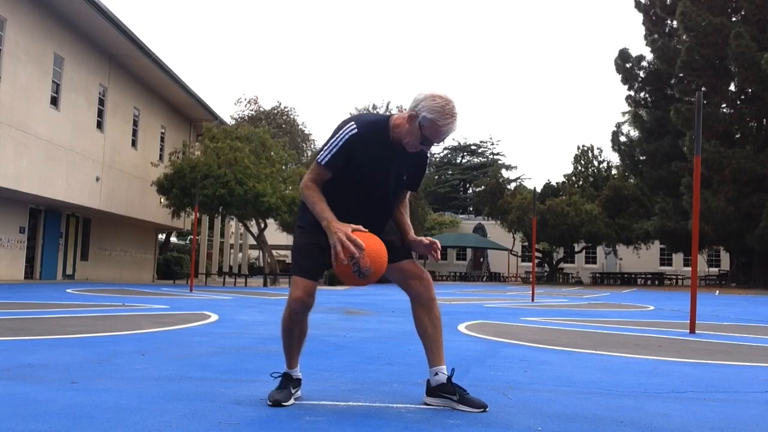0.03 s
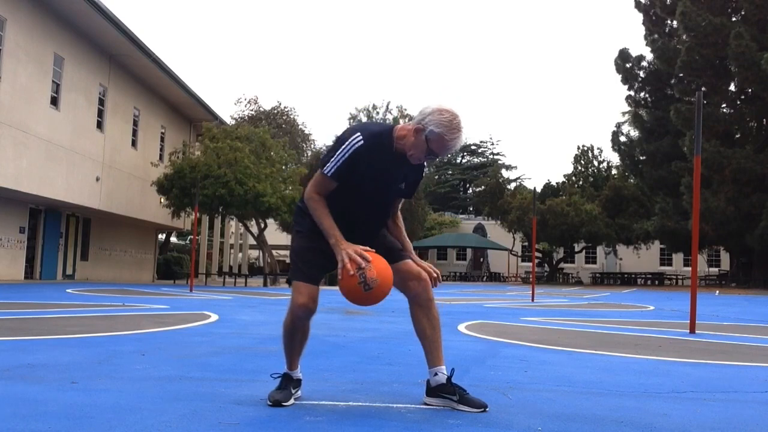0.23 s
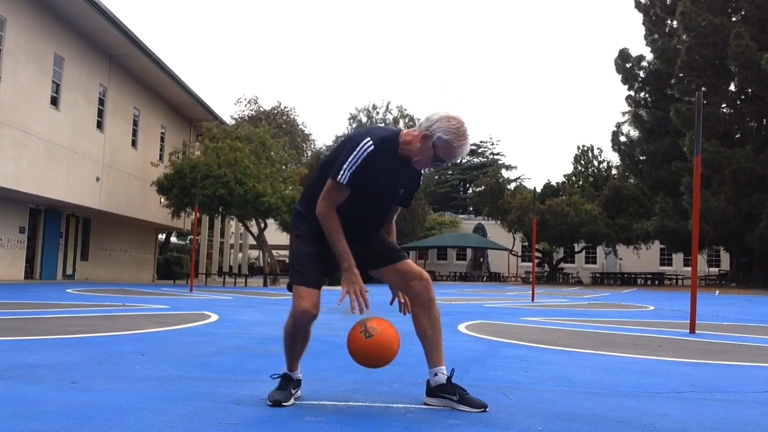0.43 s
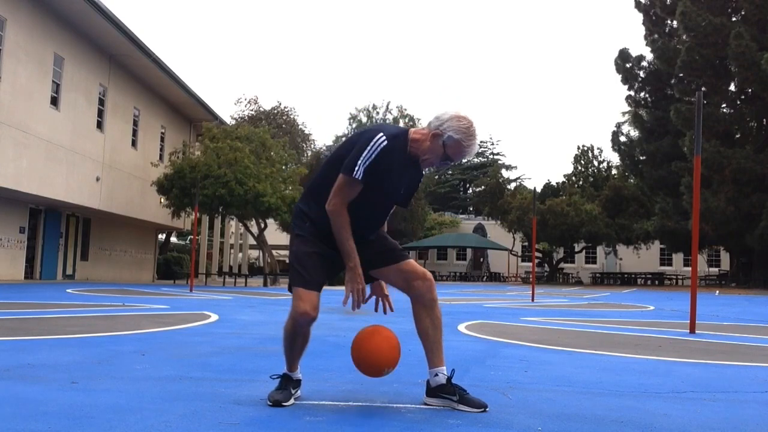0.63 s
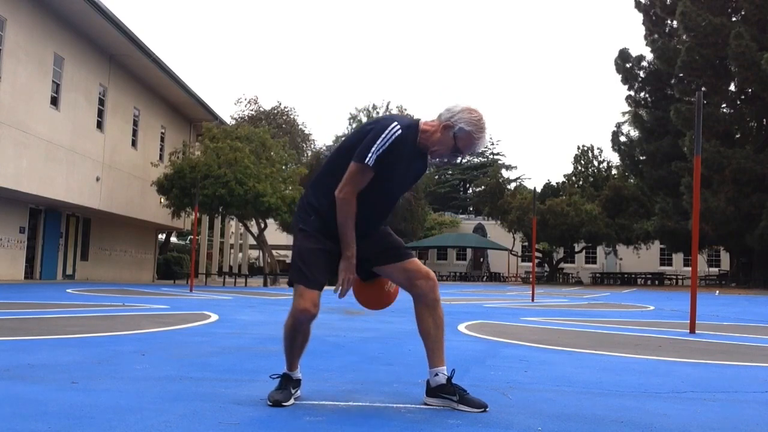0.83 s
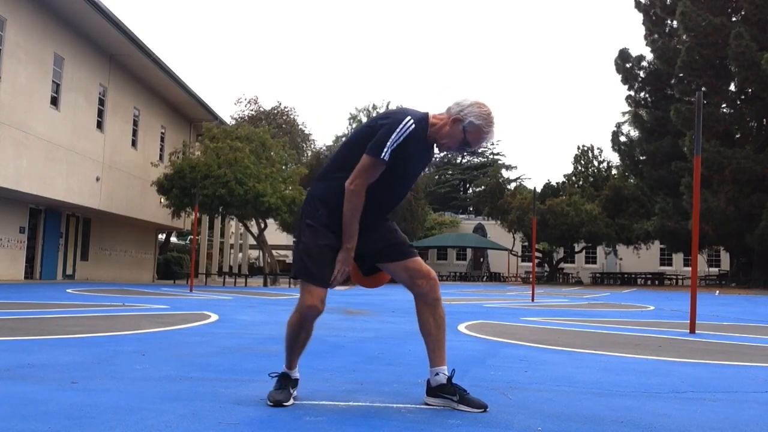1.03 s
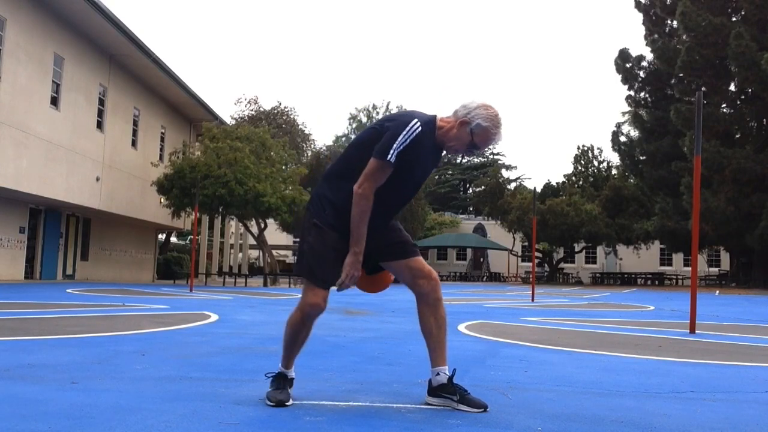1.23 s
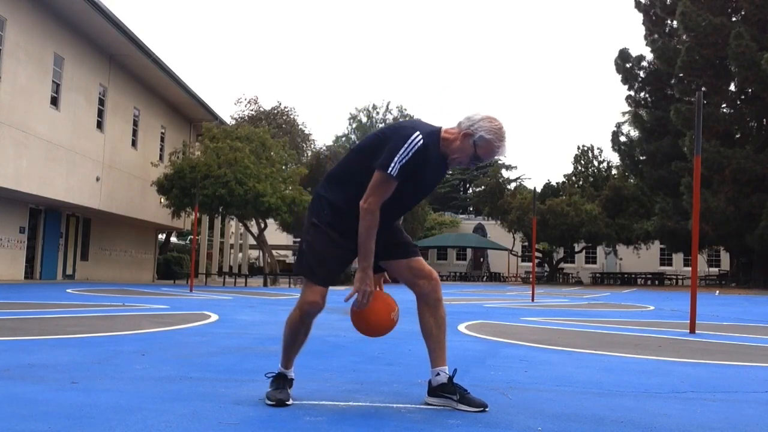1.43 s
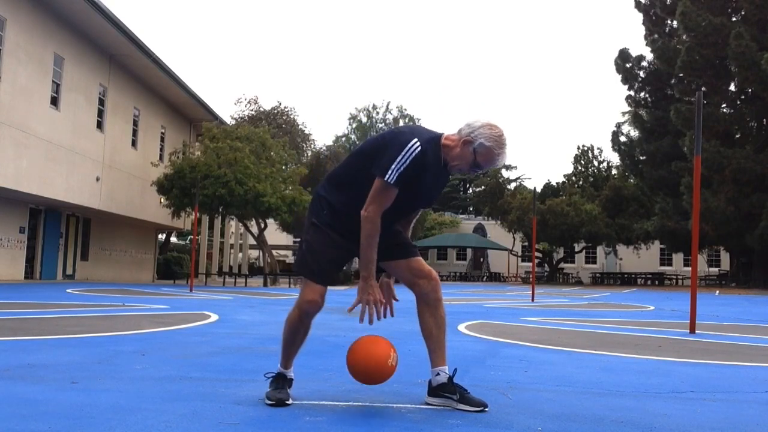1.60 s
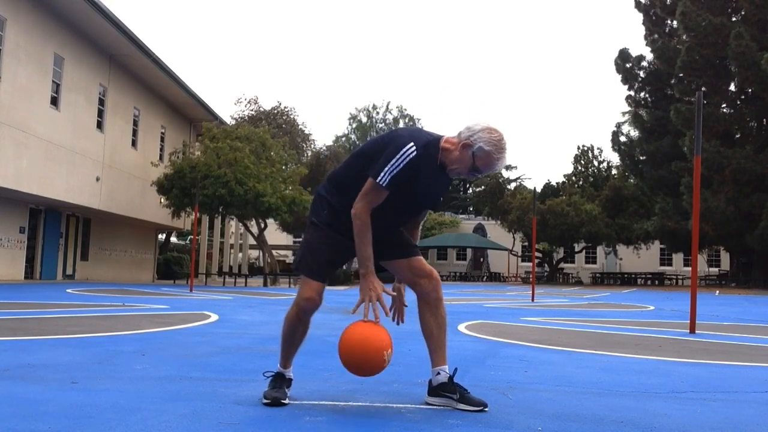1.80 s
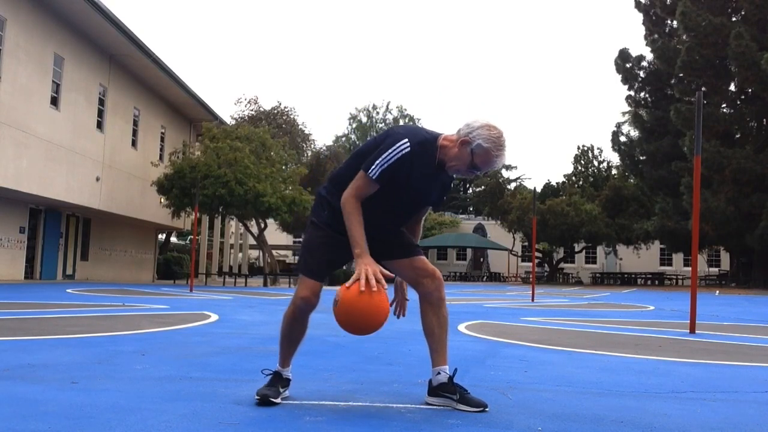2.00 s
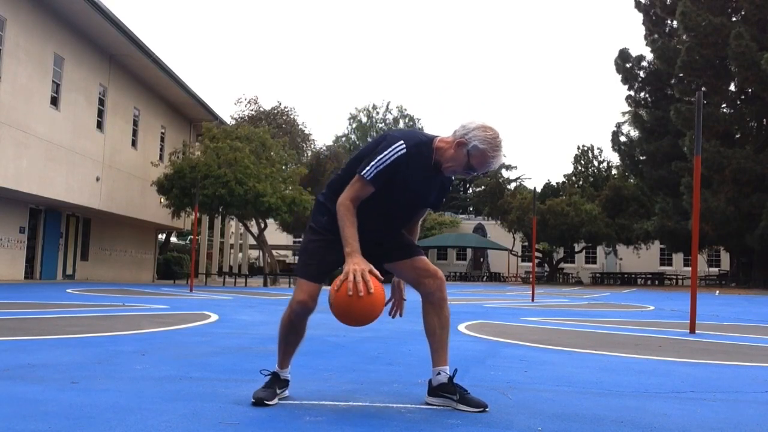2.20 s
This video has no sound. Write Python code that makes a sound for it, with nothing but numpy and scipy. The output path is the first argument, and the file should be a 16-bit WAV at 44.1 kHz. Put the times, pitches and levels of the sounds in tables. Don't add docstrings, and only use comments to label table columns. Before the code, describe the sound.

A basketball bounces on a hard outdoor court at about 0.57 s: a sharp slap, a low hollow thump, a brief airy ring and echoes from nearby buildings. Faint cloth ticks and low wind puffs follow around 0.9-1.5 s. A softer second bounce lands at 1.66 s, then a shoe grinds and crunches on grit from 1.76 to 2.05 s. Quiet distant town hum and a very faint cricket lie beneath.

```python
import sys
import numpy as np
from scipy import signal
from scipy.fft import rfft, irfft
from scipy.io import wavfile
from scipy.ndimage import uniform_filter1d

SR = 44100
rng = np.random.default_rng(int(sys.argv[2]) if len(sys.argv) > 2 else 0)


def put_to_file(sound):
    columns = np.atleast_2d(sound).T
    safe = np.clip(columns, -1, 1)
    whole_steps = np.round(safe * 32767)
    wavfile.write(sys.argv[1], SR, whole_steps.astype(np.int16))


def natural_amplitude(level_db):
    exponent = np.asarray(level_db, float) / 20
    return 10 ** exponent


N = 99357


def evened(x):
    return x / np.sqrt(np.mean(x ** 2) + 1e-20)


def read(points, hz):
    f, value = np.transpose(points)
    return np.interp(np.log(hz + 1), np.log(f + 1), value)


def curve(points, t):
    s, db = np.transpose(points)
    return natural_amplitude(np.interp(t, np.r_[s[0] - .02, s, s[-1] + .08], np.r_[-90, db, -90]))


def add(mix, s, sound):
    part = mix[round(s * SR):][:len(sound)]
    part += sound[:len(part)]


def coloured(x, spectrum):
    gain = natural_amplitude(read(spectrum, np.fft.rfftfreq(len(x), 1 / SR)))
    return irfft(rfft(x) * gain, len(x))


def low(x, hz):
    return signal.sosfilt(signal.butter(2, min(hz, 20000), fs=SR, output="sos"), x)


# frequency in Hz, level in dB per Hz.
HUM_SPECTRUM = [(15, -28), (25, -7), (80, 0.5), (266, -8), (411, -8), (2390, -30), (3360, -28.5),
                (7440, -36), (8000, -24.5), (10400, -79), (17600, -120)]


def hum():
    hz = np.fft.rfftfreq(1024, 1 / SR)[:, None]
    a, b, patches = rng.standard_normal((N // 256 + 5, 513, 3)).T
    patches = evened(uniform_filter1d(uniform_filter1d(patches, 10, 0), 10, 1))
    patch_db = 1.3 + 0.3 * (hz < 250)
    level_db = read(HUM_SPECTRUM, hz) - 60 * (hz > 8200) + patch_db * patches
    noise = signal.istft((a + 1j * b) * natural_amplitude(level_db), nperseg=1024, noverlap=768)[1][:N]
    return natural_amplitude(-46.5) * evened(noise)


def cricket():
    clicks_per_s, mode_hz, width_hz = 59, 3358, 44
    t = np.arange(N) / SR
    jitter = 0.01 * evened(uniform_filter1d(rng.standard_normal(N), 3000))
    phase = np.cumsum(clicks_per_s * (1 + jitter)) / SR % 1
    throb = np.exp(-np.pi * width_hz * phase / clicks_per_s) * np.minimum(phase / 0.054, 1)
    swell = natural_amplitude(2.3 * evened(uniform_filter1d(rng.standard_normal(N), 5000)))
    return natural_amplitude(-69.5) * evened(throb * swell * np.sin(2 * np.pi * mode_hz * t))


# centre in seconds, level in dB, frequency in Hz, length in seconds.
WIND_PUFFS = [(1.2, -44, 95, 0.039), (1.238, -33, 95, 0.0094), (1.277, -31.5, 119, 0.0059),
              (1.292, -25, 106, 0.0021), (1.305, -31, 93, 0.018), (1.393, -42, 149, 0.0077),
              (1.445, -39, 50, 0.034), (.893, -37.5, 130, 0.0097), (3.6, -40.5, 83, 0.025),
              (1.48, -43.5, 138, 0.065), (0.206, -61, 71, 0.016), (0.433, -51, 87, 0.026)]


def wind():
    out = np.zeros(N)
    for s, db, hz, length in WIND_PUFFS:
        t = np.arange(-3 * length, 3 * length, 1 / SR)
        lump = np.exp(-.5 * (2 * t / length) ** 2) * np.cos(2 * np.pi * hz * t)
        add(out, s - 3 * length, -natural_amplitude(db) * lump)
    return out


def burst(db, hz, t60, tone_db, noise):
    t = np.arange(len(noise)) / SR
    tone = natural_amplitude(tone_db) * np.sqrt(2) * np.sin(2 * np.pi * hz * t)
    attack = np.minimum(t / .0016, 1)
    return natural_amplitude(db - 11.5 - 60 * t / t60) * attack * (noise + tone)


# start in
# seconds, level in dB, frequency in Hz.
TICKS = [(0.9593, -38.5, 3490), (1.009, -37.5, 3630), (1.1097, -37, 3220), (1.145, -36, 4250),
         (1.1578, -27.5, 2220), (1.208, -35.5, 1890), (1.4385, -49, 3215), (1.475, -36.5, 3480),
         (0.5625, -16, 750)]


def ticks():
    out = np.zeros(N)
    for s, db, hz in TICKS:
        near = [(hz / 4, -14), (hz, 0), (hz * 2.1, -12)]
        noise = evened(coloured(rng.standard_normal(2048), near))
        add(out, s, burst(db, hz, 0.021, -2.5, noise))
    return out


# frequency in Hz, level in dB.
GRIT_SPECTRUM = [(500, -5), (900, 0), (1500, -6), (2100, -7), (2800, -14), (4200, -10.5), (5400, -22),
                 (7200, -21), (8000, -48)]
# time in seconds, level in dB.
DRAGS = [
    [(1.8, -51), (1.83, -47.5), (1.95, -43.5), (2.04, -51), (2.08, -58.5)],
    [(.92, -61), (1.05, -54), (1.17, -58), (1.3, -61), (1.5, -60)],
]
# start in seconds, level in dB, low and high resonance in Hz, level of the high part in dB.
CRUNCHES = [(1.7612, -33, 926, 4300, -5.5), (1.7892, -33, 1000, 3010, -11), (1.8183, -33, 1460, 4500, -14),
            (1.82, -23, 1300, 3580, -32), (1.8432, -24, 1820, 4320, -4), (1.861, -33, 1450, 4800, -5),
            (1.866, -29.5, 1440, 4330, -2), (1.884, -26, 1410, 3770, -7), (1.903, -35, 1330, 3900, -4),
            (1.909, -30, 1580, 3570, -2), (1.9275, -27.5, 1510, 4200, -15), (1.9451, -24, 1000, 4170, -24),
            (1.954, -28.5, 1550, 3700, -5), (1.965, -35, 1900, 4700, 2.5), (1.9715, -25.5, 1490, 4270, -15),
            (1.978, -36, 1490, 4100, 2), (1.995, -36, 1070, 3900, -4), (2.023, -26, 955, 3700, -11),
            (2.0417, -27, 1540, 3520, -5), (2.049, -30, 870, 4360, -16)]


def shoe():
    grains_per_s, grain_t60 = 2500, .007
    grains, t = np.zeros(N), np.arange(600) / SR
    for _ in range(12):
        struck = rng.random(N) < grains_per_s / SR / 12
        train = natural_amplitude(2.8 * np.minimum(rng.exponential(1, N), 4)) * struck
        grain = rng.standard_normal(600) * natural_amplitude(-60 * t / grain_t60)
        grains += signal.oaconvolve(train, grain)[:N]
    out = evened(coloured(grains, GRIT_SPECTRUM)) * sum(curve(drag, np.arange(N) / SR) for drag in DRAGS)
    for s, db, hz, high_hz, high_db in CRUNCHES:
        high_band = [(high_hz / 1.25, -24), (high_hz, 0), (high_hz * 1.2, -24)]
        noise = evened(coloured(rng.standard_normal(2048), GRIT_SPECTRUM))
        high = evened(coloured(rng.standard_normal(2048), high_band))
        add(out, s, burst(db + 2.5, hz, 0.025, -1, noise + natural_amplitude(high_db) * high))
    return out


# frequency in Hz, decay time t60 in seconds.
YARD_DECAY = [(100, 0.96), (200, 3.9), (800, 3.74), (2000, 2), (5000, 1.1)]
# frequency in Hz, level in dB.
YARD_SPECTRUM = [(60, -5.5), (130, 0), (300, -8), (700, -5.5), (1300, -3.5), (1950, -3.5), (2800, -3),
                 (6000, 2)]


def yard(x):
    taps = np.zeros(2 * SR)
    at = np.arange(300, 2 * SR - 20, 20)
    taps[at + rng.integers(0, 20, len(at))] = rng.choice([-1., 1.], len(at))
    hz, t, z = signal.stft(taps, SR, nperseg=512)
    hz = hz[:, None]
    far = natural_amplitude(-60 * t / np.maximum(read(YARD_DECAY, hz), .1))
    near = natural_amplitude(6 - 60 * t / 0.28) * (hz > 900)
    rise = np.minimum(t / 0.021, 1)
    tail = signal.istft(z * (far + near) * rise, SR, nperseg=512)[1]
    tail = tail / np.linalg.norm(tail)
    return natural_amplitude(-14.5) * signal.fftconvolve(coloured(x, YARD_SPECTRUM), tail)[:N]


# arrival in seconds, thump in dB, thump in Hz, thump length in seconds, slap in dB.
WALL_RETURNS = [(.603, -21.5, 132.3, 0.059, -26.5), (.62, -27.5, 190, 0.016, -35),
                (.812, -33, 132, 0.024, -44), (.865, -41, 128, 0.038, -48), (1.673, -16, 135, 0.0099, -27),
                (1.69, -27, 162.5, 0.031, -30), (1.71, -25.5, 104, 0.014, -36),
                (1.731, -27.5, 131, 0.016, -54.5), (1.75, -31.5, 114, 0.014, -47),
                (1.76, -41, 200, 0.0053, -31.5), (1.801, -40, 133.5, 0.04, -38.5)]


def echo(sound, thump_db, thump_hz, length, slap_db):
    taps = np.zeros(round(0.01 * SR) + 2)
    taps[(rng.random(5) * (len(taps) - 1)).astype(int)] = rng.uniform(-0.46, 0.27, 5)
    taps[0] = 1
    slap = low(signal.oaconvolve(np.diff(sound[:round(.1 * SR)]), taps), 1300)
    u = np.arange(len(slap)) / SR / length
    release_db = 40 * np.maximum(u - 1, 0) * length / .018
    shape = np.minimum(u / 0.11, 1) * natural_amplitude(-4 * u - release_db)
    thump = shape * np.sin(2 * np.pi * thump_hz * u * length)
    return natural_amplitude(thump_db) * thump + natural_amplitude(slap_db) * slap / abs(slap).max()


def walls(start, sound):
    out = np.zeros(N)
    for at, *back in WALL_RETURNS:
        if 0 < at - start < .5:
            add(out, at, echo(sound, *back))
    return out


# frequency in Hz, level in dB.
AIR_MODES = [(834, 1.5), (1125, -3.5), (1400, -3.5)]
# time in seconds, lower mode in dB (the highest mode follows it),
# middle mode in dB.
RING_LEVELS = [
    [(.615, -39.5, -62), (.64, -50.5, -62), (.68, -48, -61), (.725, -65, -51), (.755, -45.5, -48.5),
     (.83, -48, -59), (.88, -63, -59), (1.08, -55.5, -75), (1.27, -69.5, -68)],
    [(1.68, -45.5, -52), (1.71, -47.5, -49), (1.74, -60, -69), (1.9, -68, -77), (2.0, -77, -79)],
]


def ring(start, points):
    t = np.arange(N) / SR
    u, points = np.maximum(t - start, 0), np.array(points)
    lower, upper = curve(points[:, :2], t), curve(points[:, ::2], t)
    heard = lower, upper, lower * natural_amplitude(-60 * u / 0.44)
    out = np.zeros(N)
    for (hz, db), share in zip(AIR_MODES, heard):
        out += natural_amplitude(db) * share * np.sin(2 * np.pi * (hz * u + rng.random()))
    waver = natural_amplitude(2.2 * evened(uniform_filter1d(rng.standard_normal(N), size=900)))
    return np.sqrt(2) * out * waver * (t > start)


# time in seconds, slap level in dB.
CONTACTS = [
    (.5663, .3),
    (1.65942, -2.8),
]
# thump in dB, thump in Hz, shell mode in Hz, crack in dB, crack limit in Hz,
# first air mode in dB, its t60 in seconds.
IMPACTS = [
    (-8, 133, 134, -22.5, 2050, -15, 0.26),
    (-13, 169, 140, -22.5, 1980, -20, 0.39),
]
# frequency in Hz, level in dB, t60 in seconds.
SKIN_MODES = [
    [(215, -35.5, 0.12), (405, -14, 0.05), (552.5, -21, 0.089), (700, -5, 0.014), (883, -20.5, 0.11),
     (955, -21.5, 0.036), (1172, -18, 0.015), (1573, -16.5, 0.025), (1900, -13, 0.016), (2120, -32.5, .026),
     (2403, -29.5, 0.039), (3700, -26.5, 0.015), (6430, -34.5, 0.016)],
    [(200, -28.5, 0.13), (428, -33, 0.043), (572, -26.5, 0.13), (750, -7.5, 0.018), (879, -25, 0.04),
     (1000, -33, 0.069), (1250, -19, 0.016), (1590, -17.5, 0.016), (1890, -14.5, 0.022), (2124, -36, 0.072),
     (2270, -39, 0.022), (3700, -20.5, 0.014), (6550, -46, 0.014)],
]


def bounce(slap_db, modes, thump_db, thump_hz, shell_hz, crack_db, crack_hz, air_db, air_t60):
    t = np.arange(-.002, .4, 1 / SR)
    u = np.maximum(t, 0)
    slap = -natural_amplitude(slap_db) * np.exp(-.5 * (t / .00016) ** 2)
    rise = 1 - np.exp(-(u / 0.0005) ** 2)
    rebound = u - .002
    thump = natural_amplitude(-60 * u / 0.067) * np.cos(2 * np.pi * thump_hz * rebound)
    shell = natural_amplitude(-12.5 - 60 * u / 0.12) * np.cos(2 * np.pi * shell_hz * rebound)
    air_rise = 1 - np.exp(-(u / 0.034) ** 4)
    air = natural_amplitude(air_db - 60 * u / air_t60) * air_rise * np.sin(2 * np.pi * 526 * u)
    skin = np.zeros(len(t))
    for hz, db, t60 in modes:
        phase = 0.36 * (rng.random() - .5)
        skin += natural_amplitude(db - 60 * u / t60) * np.sin(2 * np.pi * (hz * u + phase))
    noise = np.diff(rng.standard_normal(len(t) + 1)) + 0.67 * rng.standard_normal(len(t))
    dull = low(low(low(noise, crack_hz), 1.22 * crack_hz), 1.7 * crack_hz)
    crack = natural_amplitude(crack_db - 60 * u / 0.064) * evened(dull + natural_amplitude(-30) * noise)
    return slap + rise * (natural_amplitude(thump_db) * (thump + shell + air) + skin + crack)


def scene():
    ball, after = np.zeros(N), np.zeros(N)
    for (s, slap_db), modes, impact, points in zip(CONTACTS, SKIN_MODES, IMPACTS, RING_LEVELS):
        sound = bounce(slap_db, modes, *impact)
        add(ball, s - .002, sound)
        after += ring(s, points) + walls(s, sound)
    return (hum() + cricket() + wind() + ticks() + shoe() + yard(ball) + after + ball)[None]


def top_cut(x):
    return signal.sosfilt(signal.butter(12, 8530, fs=SR, output="sos"), x)


def record(dry):
    thin = signal.sosfilt(signal.butter(2, 70.6, "high", fs=SR, output="sos"), dry)
    edge = signal.firwin(401, 7590, window=("kaiser", 8), fs=SR)[None]
    return top_cut(signal.oaconvolve(thin, edge, "same"))


dry = scene()
out = record(dry)
put_to_file(out)
```